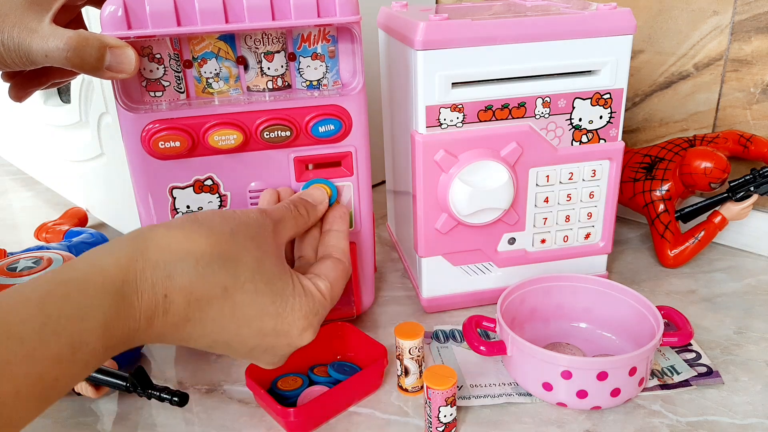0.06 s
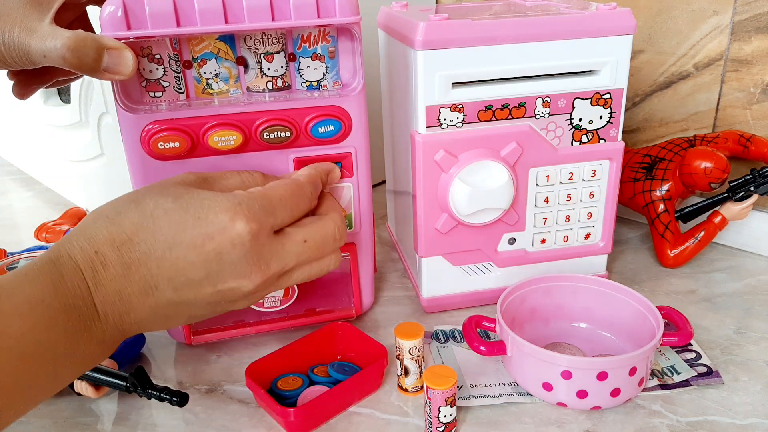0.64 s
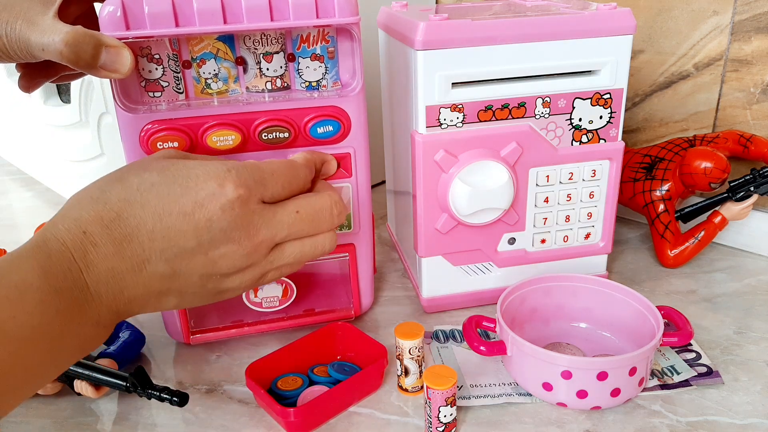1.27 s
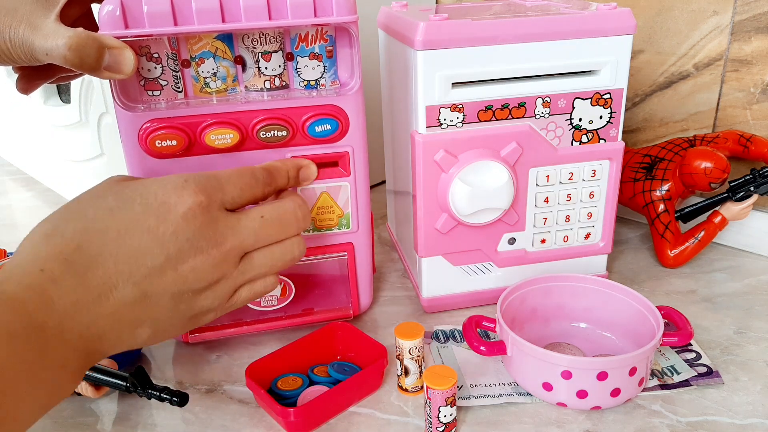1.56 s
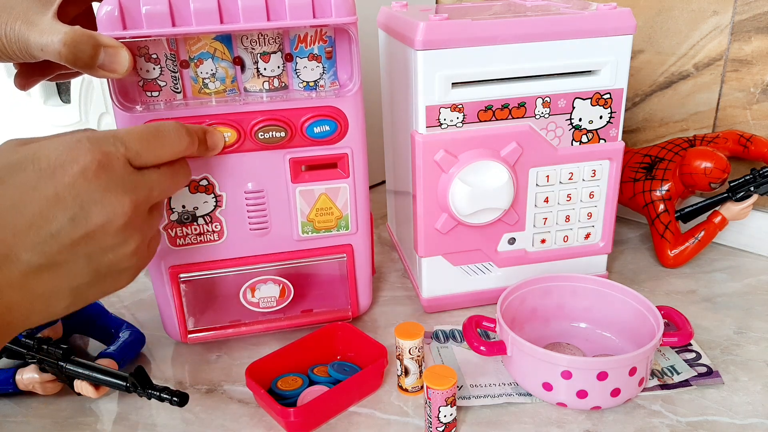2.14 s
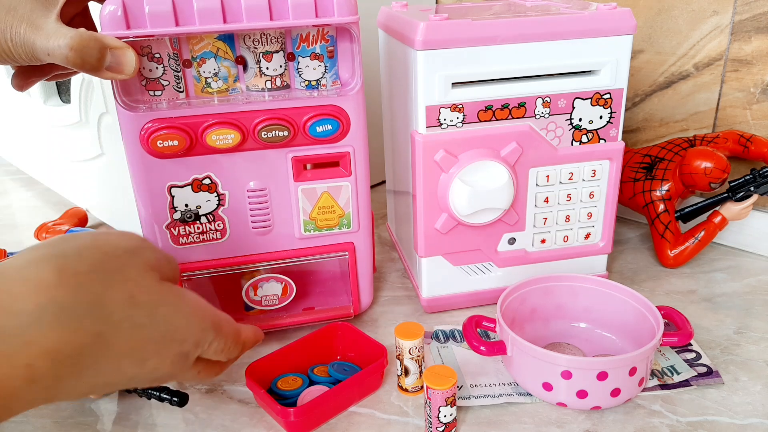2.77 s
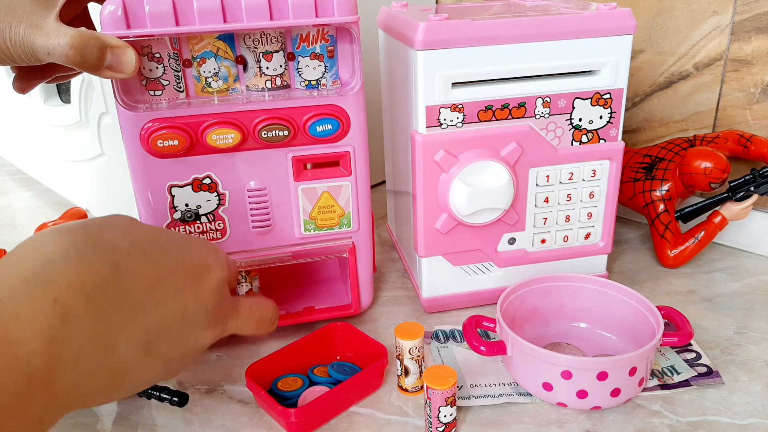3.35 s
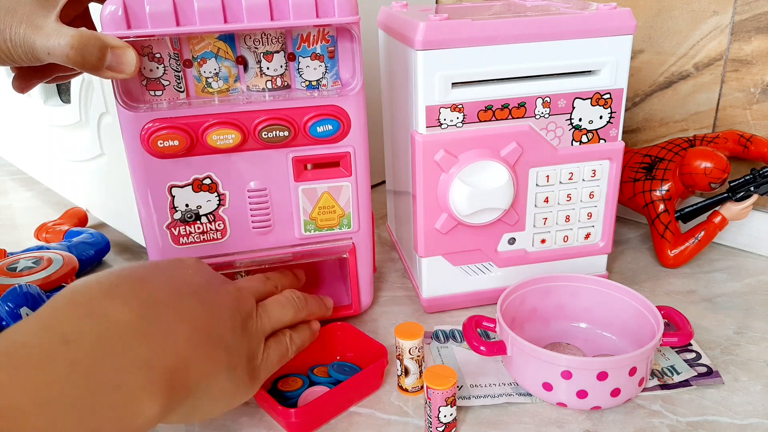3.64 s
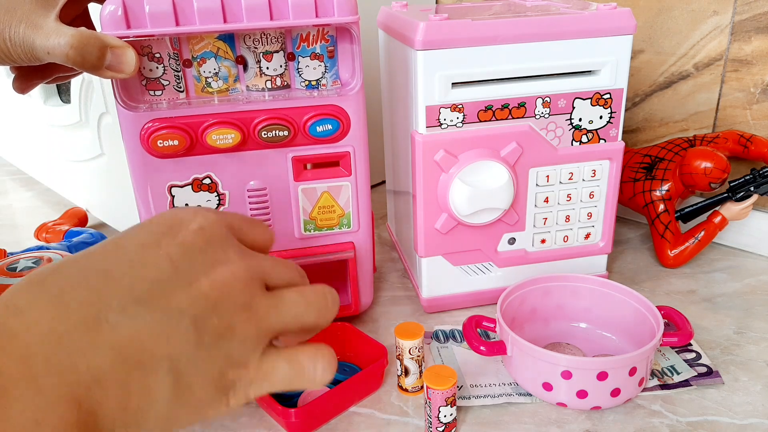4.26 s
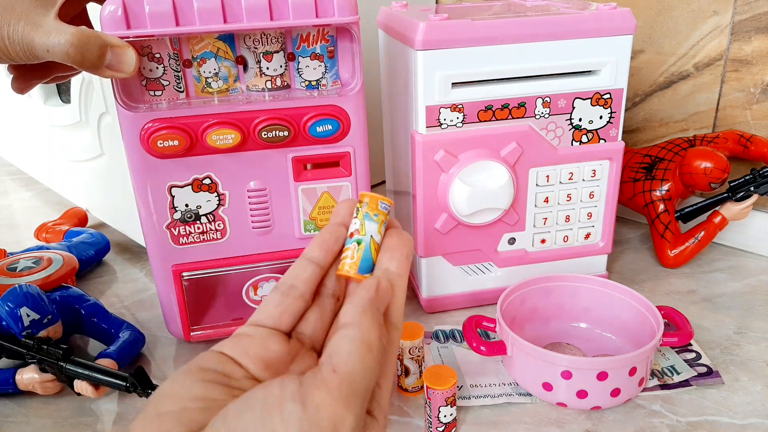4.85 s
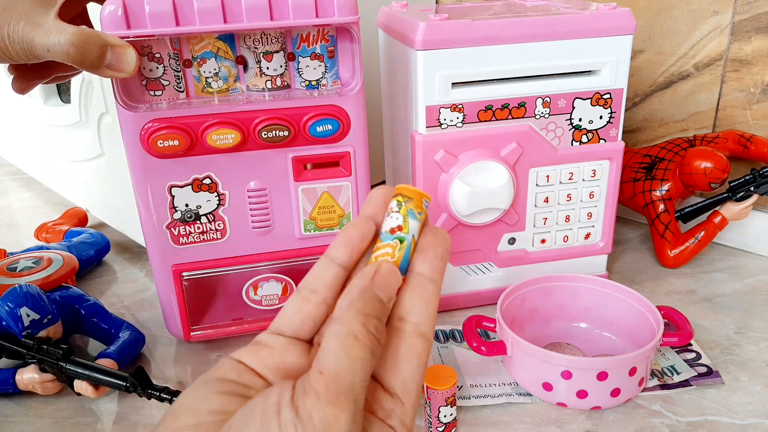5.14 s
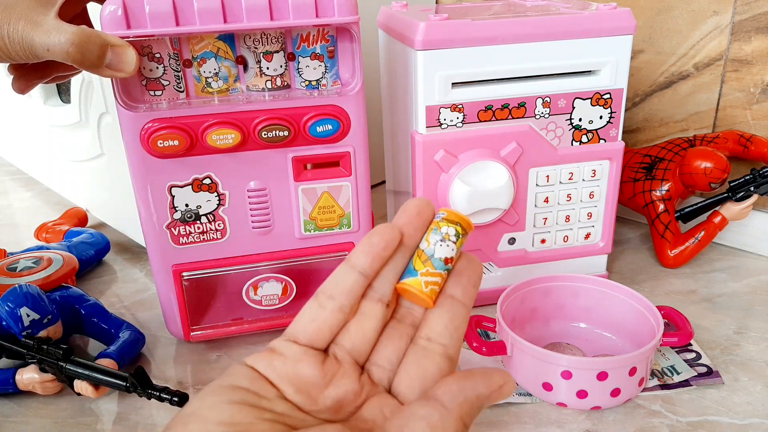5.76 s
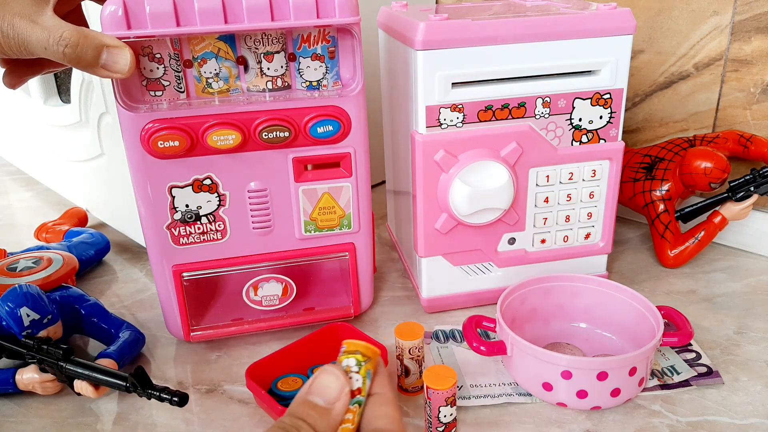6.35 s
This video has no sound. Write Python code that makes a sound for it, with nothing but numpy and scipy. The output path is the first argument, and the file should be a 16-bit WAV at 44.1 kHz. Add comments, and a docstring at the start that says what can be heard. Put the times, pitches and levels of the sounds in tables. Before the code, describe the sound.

Light plastic clicks open the sound as a coin is fitted into the slot of a toy vending machine, with a sharper knock at about 0.6 seconds. Fingers rub on the casing, and from 1.2 to 1.4 seconds the coin tumbles inside with a hollow rattle. At 2 seconds a button clunks and a small toy can knocks down the chute, ending in a loud, sharp clack near 2.6 seconds. From about 2.8 seconds, softer taps and bumps come from the tray as fingers fish for the can, with a low thud at 3.3 seconds as the toy rocks on the table. The clatter builds again and the flap slaps shut around 4.4 seconds. After that, a faint low appliance hum remains until the end, just past 6 seconds. Everything is close, slightly left, with the short echo of a small hard room.

```python
"""A small hard room, with a plastic toy vending machine on a table close to a stereo microphone.
A coin is pushed through the slot and tumbles inside, a button releases a toy can, fingers fish it out
of the tray and the flap slaps shut. Each knock makes the hollow plastic ring and the room echo, and
heavy ones rock the toy with a thud. Fingers rub on the casing; an appliance hums behind."""
import sys
import numpy as np
from scipy import signal
from scipy.fft import rfft, irfft
from scipy.io import wavfile
from scipy.ndimage import uniform_filter1d

SR = 44100
rng = np.random.default_rng(int(sys.argv[2]) if len(sys.argv) > 2 else 0)


def master(y):
    """Save y as 16-bit WAV."""
    cut = np.clip(np.atleast_2d(y).T, -1, 1)
    pcm = np.round(cut * 32767)  # scale
    wavfile.write(sys.argv[1], SR, pcm.astype(np.int16))


N = 282240
TIME = np.arange(N) / SR
FIRM_DB = -28  # an ordinary firm knock in the knock tables


def undb(db):
    """Turn decibels into a gain."""
    return 10 ** (np.asarray(db) / 20)


def unit(x):
    """Scale a sound to an average (rms) level of 1."""
    return x / np.sqrt(np.mean(x ** 2) + 1e-30)


def add(track, start_s, sound):
    """Mix a sound into the track."""
    start = max(int(start_s * SR), 0)
    track[:, start:start + sound.shape[1]] += sound[:, :N - start]


def at_pitch(hz, table, column=1):
    """Read a table at any pitch, sliding between its rows."""
    table = np.array(table)
    return np.interp(np.log(np.maximum(hz, 1)), np.log(table[:, 0]), table[:, column])


def noise(size, spectrum, apart_hz):
    """Noise shaped by (pitch_hz, level_db) rows; left and right are alike below apart_hz."""
    hz = np.fft.rfftfreq(size, 1 / SR)
    mid, side = rfft(rng.standard_normal((2, size)))
    side = side * (hz + apart_hz / 10) / (np.hypot(hz, apart_hz) + apart_hz / 10)
    return unit(irfft(np.array([mid + side, mid - side]) * undb(at_pitch(hz, spectrum)), size))


def band(x, low_hz, high_hz):
    """Keep the sound between two pitches."""
    edges = [low_hz, min(high_hz, SR / 2 - 1)]
    return signal.sosfilt(signal.butter(4, edges, "band", fs=SR, output="sos"), x)


def wander(rate_hz):
    """A smooth random wobble, about 1 in size."""
    size = int(SR / rate_hz)
    steps = np.repeat(rng.standard_normal(N // size + 1), size)
    return unit(uniform_filter1d(uniform_filter1d(steps, size), size)[:N])


def fade(t, fade_s):
    """Die away by 60 dB in fade_s seconds."""
    return np.exp(-np.log(1000) * t / np.maximum(fade_s, 1e-3))


def ring(t, hz, ring_s, spread):
    """Fading tones; the higher ones are more out of step between left and right."""
    skew = spread * rng.standard_normal(np.shape(hz)) * hz ** 2 / (hz ** 2 + 900 ** 2)
    return np.array([np.sin(2 * np.pi * hz * t + side * skew) * fade(t, ring_s) for side in (-1, 1)])


# the room's low rumble: pitch_hz, relative_db
ROOM_NOISE = [(25, -31.5), (65, -30), (90, -3.5), (120, -2), (160, -15), (230, -26), (320, -13),
              (420, -24.5), (560, -30), (750, -41), (1200, -50), (5800, -60.5), (7200, -54.5), (8600, -66),
              (15000, -54)]
# the appliance's tones: pitch_hz, level_db
HUM_TONES = [(97.5, -55), (118.5, -61), (300, -74), (333, -71), (376, -59.5), (1378, -93), (6470, -100)]
# faint low tones that swell and fade: start_s, length_s, pitch_hz, level_db
PASSING_TONES = [(0.894, 0.26, 158, -37), (1.543, 0.21, 178.6, -48), (1.804, 0.23, 264, -51)]
def background(hum_gain_db, noise_db, waver_db, drift):
    """An appliance's wavering hum over low room noise, and a few faint passing tones."""
    out = noise(N, ROOM_NOISE, apart_hz=600) * undb(noise_db)
    for hz, db in HUM_TONES:
        phase = 2 * np.pi * hz * TIME + drift * wander(4.6)
        out += np.sqrt(2) * undb(db + hum_gain_db + waver_db * wander(6.4)) * np.sin(phase)
    for start_s, length_s, hz, db in PASSING_TONES:
        swell = np.sin(np.pi * np.clip((TIME - start_s) / length_s, 0, 1)) ** 2
        out += undb(db) * swell * np.sin(2 * np.pi * hz * TIME)
    return out * undb([[1.7], [-1.7]])  # louder on the left


# the room's echo: pitch_hz, level_db, fade_s
ECHO = [(120, -2.5, 0.9), (363, 2, 0.51), (990, -7, 0.5), (2500, -1, 0.47), (5900, -6, 0.47),
        (15000, -6, 0.34)]
def room_echo(dry, gap_s, early_db, early_s, size=44100):
    """Sound bounces quickly off table and wall, then blurs into a tail whose treble dies first."""
    t, response = np.arange(size) / SR, 0
    early_boost = 1 + undb(early_db) * np.exp(-t / early_s)
    onset = 1 - np.exp(-(t / gap_s) ** 2)
    for low_hz in 70 * 2. ** np.arange(9):
        middle_hz = low_hz * np.sqrt(2)
        shape = fade(t, at_pitch(middle_hz, ECHO, column=2)) * early_boost * onset
        echoes = band(noise(size, [(1, 0)], apart_hz=1000), low_hz, 2 * low_hz)
        response += undb(at_pitch(middle_hz, ECHO)) * echoes * unit(shape) / np.sqrt(size)
    return signal.fftconvolve(dry, response, axes=1)[:, :N]


# the hand nudges the whole toy: start_s, level_db
NUDGES = [(1.458, -36.5), (3.318, -26)]
def thuds(pitch_hz, ring_s, gain_db, growth, size=16384):
    """The toy rocks on the table under heavy knocks and nudges; growth is dB of thud per dB of knock."""
    out, t = np.zeros((2, N)), np.arange(size) / SR
    rock = ring(t, pitch_hz, ring_s, spread=0) * (1 - np.exp(-(t / 0.013) ** 2))
    for start_s, db, *_ in COIN_KNOCKS + BUTTON_KNOCKS + TRAY_KNOCKS:
        add(out, start_s, undb(FIRM_DB + gain_db + growth * (db - FIRM_DB)) * rock)
    for start_s, db in NUDGES:
        add(out, start_s, undb(db) * rock)
    return out


def strokes(table, rise_s=.02, fade_s=.35):
    """Loudness of hand strokes: each builds quickly, holds and dies away."""
    return sum(undb(db) * np.exp(np.minimum(TIME - start, 0) / rise_s)
               * fade(np.maximum(TIME - end, 0), fade_s) for start, end, db in table)


# the plastic's many weak tones, blurred into noise: pitch_hz, relative_db
PLASTIC_NOISE = [(100, -12), (200, -6.5), (320, 3.5), (500, -8.5), (850, 11), (1600, 0.5), (2400, -2),
                 (3200, -5), (5200, -6.5), (7200, -13.5), (8800, -28.5), (11000, -21), (15500, -21.5)]
# fingers and coin rubbing on plastic: start_s, end_s, level_db
RUBS = [(.3, .52, -59), (.72, .8, -58.5), (.86, .93, -46), (1.13, 1.46, -44), (1.93, 2.3, -58.5),
        (2.42, 2.58, -46.5), (3.15, 3.3, -59.5), (4.25, 4.42, -52.5)]
# skin brushing past: start_s, end_s, level_db
BRUSHES = [(3.65, 3.72, -72.5), (3.83, 4.1, -67), (6.28, 6.32, -75.5)]
def fingers(grain_db):
    """Fingers and coin stick and slip on the casing; skin brushes softly."""
    slips = unit(undb(grain_db * wander(70)))
    rub = noise(N, PLASTIC_NOISE, apart_hz=700) * slips * strokes(RUBS)
    skin_hiss = [(500, -9.5), (2000, -6.0), (5000, -6.5), (7000, -0.5), (8800, -11.5), (14000, -4.5)]
    return rub + noise(N, skin_hiss, apart_hz=485.4) * strokes(BRUSHES)


def knock(t, tones, ring_s, tones_db, damping, spread):
    """One knock rings the plastic's main tones over a short burst of its weaker ones."""
    hz, db = np.transpose(tones)[:, :, None]
    place, detune = rng.standard_normal((2, len(hz), 1))
    width_hz = 9 + damping * hz  # wider tones die sooner
    tone_fade_s = np.log(1000) / (np.pi * width_hz)
    # where the knock lands sets each tone's strength and sign
    gain = undb(db + 5.7 * place) * width_hz * rng.choice([-1, 1], hz.shape)
    ringing = (gain * ring(t, hz * (1 + 0.0034 * detune), tone_fade_s, spread)).sum(1)
    burst = noise(len(t), PLASTIC_NOISE, apart_hz=1020) * fade(t, ring_s)
    return unit(burst) + undb(tones_db) * unit(ringing)


# borders of the bass, middle, treble and sheen (the very top): pitch_hz
BAND_EDGES = [180, 600, 2000, 8500, 17000]
def clatter(knocks, tones, gain_db, bass_db, bass_growth, treble_db, sheen_db, sheen_growth,
            tock_db, tock_cycles, tones_db, damping, flex, spread, size=8192):
    """Force sets each knock's bass, hardness its treble and sheen; the struck spot adds a pitched tock."""
    out, t = np.zeros((2, N)), np.arange(size) / SR
    contact = t < .0116  # each part's level is set over this first moment
    for start_s, db, hardness_db, pitch_hz, ring_s in knocks:
        # a drawn-out knock also takes longer to bend the panels
        attack = 1 - np.exp(-(t / (flex * ring_s)) ** 2)
        hit = knock(t, tones, ring_s, tones_db, damping, spread) * attack
        tock = ring(t, pitch_hz, tock_cycles / pitch_hz, spread) * attack
        parts = [band(hit, low, high) for low, high in zip(BAND_EDGES, BAND_EDGES[1:])] + [tock]
        force_db = db - FIRM_DB
        # small stiff spots sound higher and move less air than broad panels
        stiffness = np.log2(pitch_hz / 850)  # octaves above an ordinary panel
        bass = bass_db + bass_growth * force_db - 3.5 * stiffness
        treble = treble_db + hardness_db
        sheen = sheen_db + sheen_growth * hardness_db + 0.26 * force_db
        # the tock stands out most in soft, light knocks
        tock_share = tock_db + 1.5 * stiffness - 0.19 * hardness_db - .1 * force_db
        for part, part_db in zip(parts, [bass, 0, treble, sheen, tock_share]):
            add(out, start_s, part / part[:, contact].std() * undb(db + gain_db + part_db))
    return out


# the coin hits slot and chute: start_s, level_db, hardness_db, pitch_hz, ring_s
COIN_KNOCKS = [(0.04, -39.5, 1, 1700, 0.039), (0.277, -40.5, -1.5, 1018, 0.026),
               (0.359, -47.5, -9.5, 760, 0.021), (0.469, -38.5, -5.5, 990, 0.027),
               (0.556, -23.5, 0.5, 800, 0.031), (0.564, -28, -10, 746, 0.025),
               (0.773, -43, -2.5, 794, .035), (0.844, -42.5, -5, 751, 0.021),
               (0.914, -40, -8.5, 812, 0.029), (1.033, -42.5, -4, 870, 0.046),
               (1.057, -39, -8.5, 780, 0.022), (1.114, -44.5, -4.5, 796, 0.039),
               (1.1631, -22, -0.5, 681, 0.04), (1.176, -27.5, 8, 860, 0.021), (1.201, -33, 3.5, 459, 0.074),
               (1.211, -39, 2.5, 567, 0.13), (1.257, -32.5, 4.5, 1970, 0.042),
               (1.277, -38.5, 7.5, 3620, 0.02), (1.3331, -33.5, 9.5, 2200, 0.035),
               (1.356, -36, 4, 770, 0.026), (1.4143, -35, -1.5, 3080, 0.017), (1.567, -49, 0, 1270, 0.031),
               (1.636, -49.5, -4.5, 588, 0.035), (1.675, -43, -11, 730, 0.032)]
# tones of the casing around the coin box: pitch_hz, relative_db
CASING_TONES = [(250, -11), (318, -14), (341, 5), (398, -5.5), (436, -13), (484, -3), (511, -4), (565, 1),
                (651, -4), (715, 0.5), (791, 5.5), (847, 1.5), (927, -10.5), (1095, 2), (1215, -7.5),
                (1415, 4.5), (1609, 2), (1650, -7.5), (2202, -1.5), (2467, -4), (3127, -22.5), (3940, -7),
                (4805, -21), (5150, -1)]
def coin_drop():
    """The coin goes through the slot and tumbles, ringing the hollow casing."""
    return clatter(COIN_KNOCKS, CASING_TONES, gain_db=-1.0, bass_db=-2.5, bass_growth=0.11,
                   treble_db=0.0, sheen_db=-7.5, sheen_growth=0.92, tock_db=-1.5, tock_cycles=24,
                   tones_db=-7.5, damping=0.022, flex=.085, spread=0.53)


# button, latch and falling can: start_s, level_db, hardness_db, pitch_hz, ring_s
BUTTON_KNOCKS = [(2.006, -44.5, -15, 574, 0.014), (2.068, -34, -5.5, 755, .045),
                 (2.086, -24.5, -6.5, 757, 0.037), (2.2, -36, -6.5, 610, 0.062),
                 (2.231, -28, -5.5, 936, 0.047), (2.32, -35.5, -9, 740, .035),
                 (2.329, -22, -1.5, 670, 0.036), (2.3743, -23.5, -6, 873, 0.038),
                 (2.394, -20.5, -12.5, 636, 0.032), (2.417, -35, -20.5, 903, .02),
                 (2.504, -37, -10, 870, .1), (2.528, -26.5, -7, 990, 0.062), (2.564, -24.5, -4, 781, 0.042),
                 (2.579, -27, -6.5, 720, 0.057), (2.629, -17.5, 0, 2370, 0.034)]
# tones of the can's chute: pitch_hz, relative_db
CHUTE_TONES = [(317, -7), (430, -17), (484, -7.5), (565, -11), (655, -16), (710, -2.5), (847, -0.5),
               (925, 1), (1001, -10.5), (1076, 3.5), (1265, -1.5), (1340, -2.5), (1920, -16.5), (2061, -4),
               (2202, -9), (2465, -10), (2637, -20.5), (3149, -8.5), (4200, -15.5), (4805, -9.5),
               (6029, -15.5)]
def can_release():
    """The button trips the latch and the can knocks its way down the chute."""
    return clatter(BUTTON_KNOCKS, CHUTE_TONES, gain_db=-2.5, bass_db=-6, bass_growth=-.2,
                   treble_db=2, sheen_db=-9.5, sheen_growth=1.15, tock_db=-2.5, tock_cycles=15,
                   tones_db=-1.5, damping=0.032, flex=0.082, spread=0.41)


# flap and can in the tray, then the can in the hand: start_s, level_db, hardness_db, pitch_hz, ring_s
TRAY_KNOCKS = [(2.84, -39.5, -14, 690, 0.034), (2.944, -45, 2, 1140, 0.039), (2.979, -41, -15, 761, 0.065),
               (3.015, -39, -13, 1050, 0.067), (3.062, -30, -14, 986, 0.062),
               (3.074, -29.5, -10, 1100, 0.04), (3.15, -40.5, -25, 680, 0.041),
               (3.209, -31, -1, 836, 0.071), (3.239, -31.5, -9.5, 737, 0.043),
               (3.257, -35, -12, 1290, 0.045), (3.29, -33.5, -29, 654, .054),
               (3.353, -42.5, -15, 1260, 0.023), (3.411, -40, -25, 746, 0.02),
               (3.597, -56.5, -25.5, 745, .03), (3.83, -44, -15, 720, .03), (3.936, -35, -6, 617, 0.019),
               (4.066, -39, -2.5, 2010, 0.027), (4.098, -33, -17.5, 1230, .012),
               (4.172, -35, -8, 1307, 0.023), (4.249, -40, 1.5, 1720, .056), (4.268, -37, 2.5, 1740, 0.068),
               (4.312, -34.5, 7.5, 1160, 0.058), (4.338, -35.5, -6, 1080, 0.039),
               (4.378, -25.5, -10, 1060, 0.031), (4.395, -26.5, -10, 1155, .051),
               (4.406, -23, 5, 2230, 0.067), (4.42, -22.5, -5, 864, 0.13), (4.443, -31, 5, 798, .08),
               (6.223, -66, -30, 802, 0.042)]
# tones of the tray and its flap: pitch_hz, relative_db
TRAY_TONES = [(317, -10), (485, -13.5), (515, -4.5), (555, -14.5), (667, -11), (737, -2), (790, -1),
              (990, -2), (1105, -1.5), (1220, -1), (1300, -4.5), (1480, -2), (1738, -14), (2000, -8.5),
              (2202, -18.5), (2780, -38), (4400, -17)]
def tray_and_flap():
    """The can bumps the tray as it is fished out, and the flap slaps shut."""
    return clatter(TRAY_KNOCKS, TRAY_TONES, gain_db=-2.5, bass_db=-9.5, bass_growth=-0.49,
                   treble_db=-4.0, sheen_db=-10, sheen_growth=1.8, tock_db=-3, tock_cycles=17,
                   tones_db=5, damping=0.046, flex=0.066, spread=0.92)


def scene():
    """Coin, button and tray, a little off centre, in the humming room."""
    coin, button, tray = coin_drop(), can_release(), tray_and_flap()
    touch = fingers(grain_db=4) + thuds(pitch_hz=95.3, ring_s=0.21, gain_db=-17.5, growth=1.9)
    left, right = coin + button + tray + touch
    # the toy stands to the left, so the right side hears it later and softer
    lag_s, balance = .00018, undb([[1.18], [-1.18]])
    direct = np.array([left, np.pad(right, (round(lag_s * SR), 0))[:N]])
    # the hand covers the tray, so it sends less to the walls than the coin does
    to_walls = undb(2.5) * coin + button + undb(1.0) * tray + touch
    echo = room_echo(to_walls, gap_s=0.0044, early_db=1.5, early_s=0.014)
    return (direct + echo) * balance + background(hum_gain_db=-0.5, noise_db=-52, waver_db=3, drift=0.86)


def record(dry):
    """Cut the treble above 16000 Hz."""
    return signal.sosfilt(signal.ellip(10, .2, 80, 16000, fs=SR, output="sos"), dry)


dry = scene()
out = record(dry)
master(out)
```